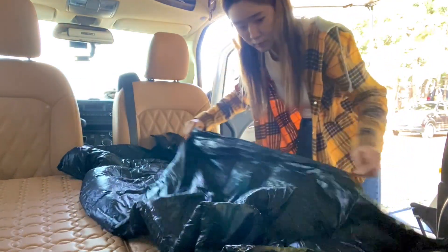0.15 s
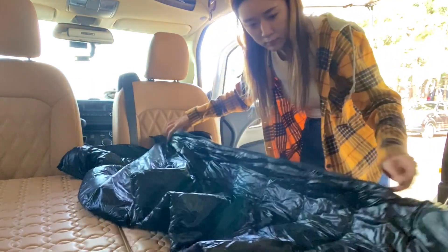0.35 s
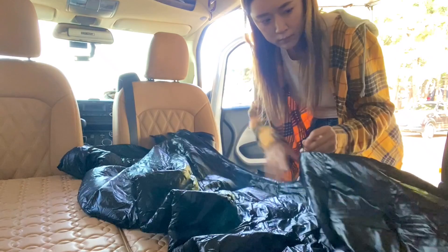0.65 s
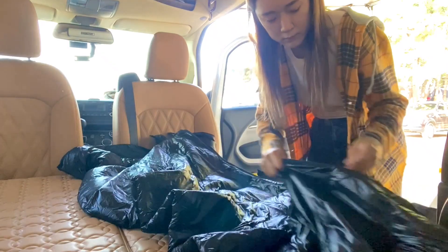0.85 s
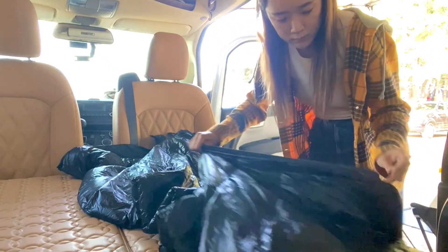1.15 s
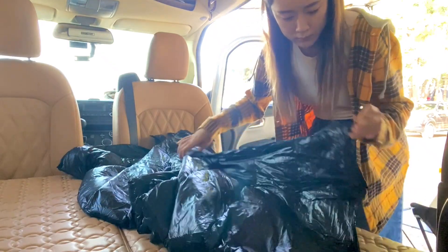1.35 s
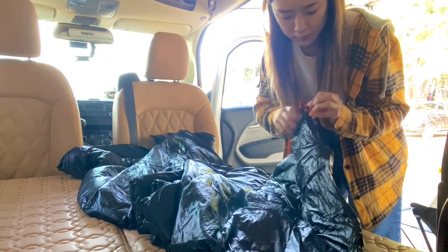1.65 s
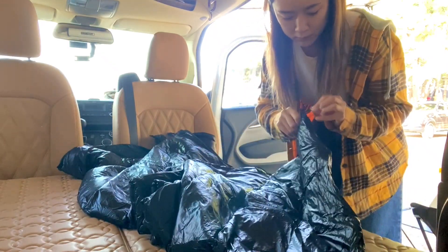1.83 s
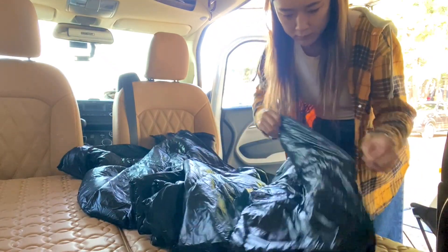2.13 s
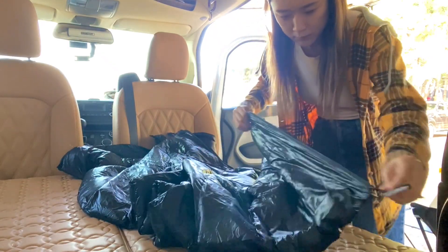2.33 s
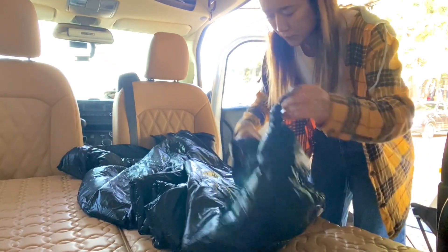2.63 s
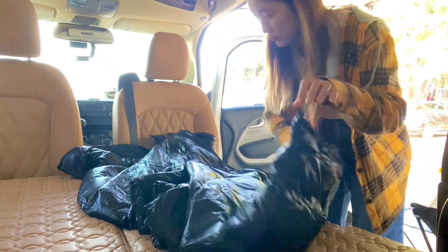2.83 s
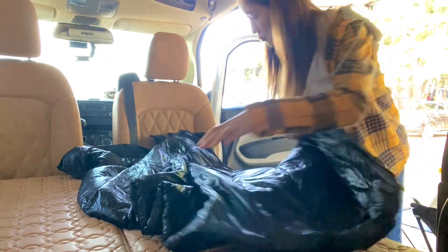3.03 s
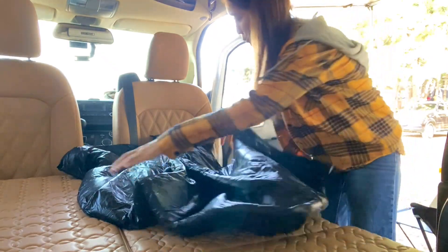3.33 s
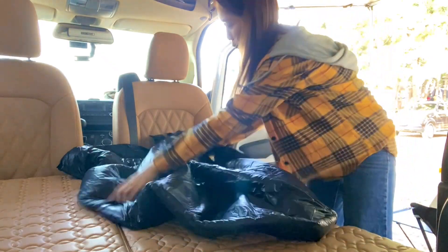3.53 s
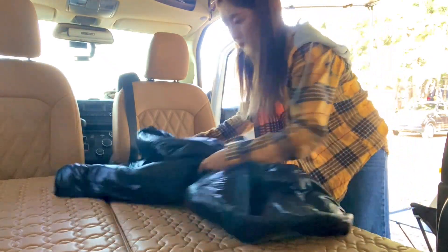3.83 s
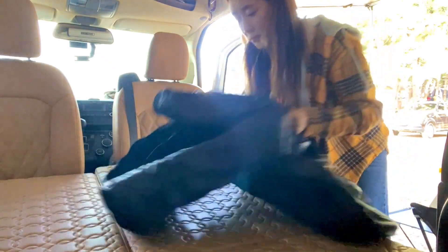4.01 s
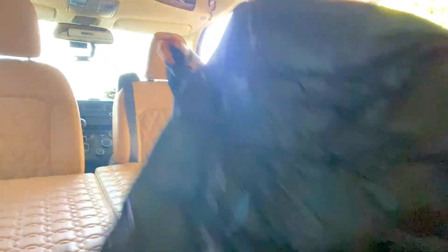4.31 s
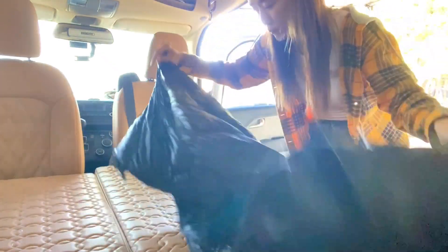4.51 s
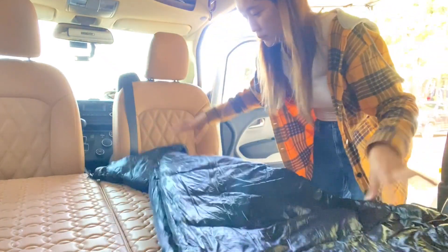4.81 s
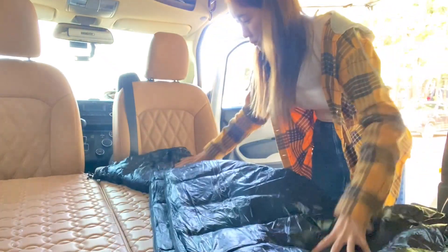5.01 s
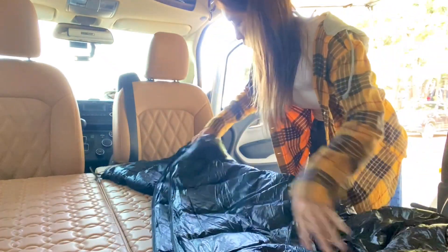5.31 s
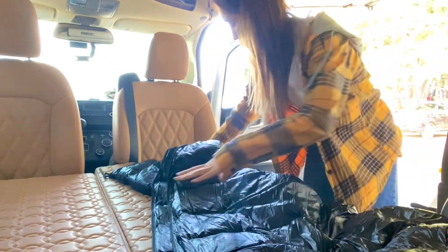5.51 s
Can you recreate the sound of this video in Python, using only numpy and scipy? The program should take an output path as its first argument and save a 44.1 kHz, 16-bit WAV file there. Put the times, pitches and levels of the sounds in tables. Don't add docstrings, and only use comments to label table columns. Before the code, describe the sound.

In a small vehicle cabin, a coil zipper rasps in four pulls, nylon rustles and flaps, and hollow thumps land above a faint motor drone.

```python
import sys
import numpy as np
from scipy import signal
from scipy.fft import rfft, irfft, next_fast_len
from scipy.io import wavfile
from scipy.ndimage import uniform_filter1d

SR = 44100
rng = np.random.default_rng(int(sys.argv[2]) if len(sys.argv) > 2 else 0)


def log_audio(samples):
    frames = np.atleast_2d(samples).T
    limited = np.clip(frames, -1, 1)
    pcm = np.round(limited * 32767).astype(np.int16)
    wavfile.write(sys.argv[1], SR, pcm)


def magnitude_from_level(level_db):
    exponent = np.asarray(level_db, float) / 20
    return 10 ** exponent


N = 249606
SIZE = next_fast_len(N)

# start_s, end_s, scrape_db against the knocks, odd_tooth_share (0-1)
PULLS = [
    (-.1, 0.313, -7, 0),
    (0.791, 1.043, -8.5, .4),
    (1.136, 1.254, -3, 0.32),
    (1.898, 2.325, -7, .2),
]


def unit(x):
    return x / np.sqrt(np.mean(np.abs(x) ** 2))


def over_hz(table):
    hz, value = np.transpose(table)
    bin_hz = np.arange(SIZE // 2 + 1) * SR / SIZE
    return np.interp(np.log(bin_hz + 1), np.log(hz), value)


def over_time(table):
    s, *columns = np.transpose(table)
    return [np.interp(np.arange(N) / SR, s, column) for column in columns]


def colour(x, gain):
    return irfft(rfft(x, SIZE) * gain, SIZE)[:N]


def walk(rate_hz):
    hold = int(SR / rate_hz)
    levels = np.repeat(rng.standard_normal(N // hold + 1), hold)
    return unit(uniform_filter1d(uniform_filter1d(levels, hold), hold)[:N])


def bumps(rows, rest_db, shape=1.76):
    t = np.arange(0, N + 64, 64) / SR
    power = magnitude_from_level(2 * rest_db)
    for s, db, rise, fall in rows:
        distance = np.where(t < s, (s - t) / rise, (t - s) / fall)
        power = power + magnitude_from_level(2 * db - 20 * np.minimum(distance, 6) ** shape)
    return np.interp(np.arange(N) / SR, t, 10 * np.log10(power))


def echoes(x, t60_s):
    t = np.arange(8192) / SR
    tail = rng.standard_normal(8192) * np.exp(-np.log(1000) * t / t60_s)
    return colour(x, rfft(tail / np.sqrt(np.sum(tail ** 2)), SIZE))


def hum(rumble_db, flap_db, split_hz=110, drift_db=3.0):
    # freq_hz, density_db per Hz
    cabin = [(13, -37), (22, -46), (45, -3), (64, -4), (106, -9), (115, -10.5), (120, -6.5), (123, -26.5),
             (145, -8.5), (161, -20.5), (195, -14), (206, -15), (217, -32), (236, -27.5), (280, -46.5),
             (360, -68), (620, -120)]
    # freq_hz, level_db rms
    motor = [
        (95., -51),
        (158., -69),
        (190.3, -63.5),
    ]
    drone_db, push_db = -61.5, 5
    high_db = 10 * np.log10(magnitude_from_level(2 * drone_db) + magnitude_from_level(2 * (flap_db + push_db)))
    upper = over_hz([(split_hz * 0.71, 0), (split_hz * 1.002, 1)])
    shape = magnitude_from_level(over_hz(cabin))
    rumble = unit(colour(rng.standard_normal(N), shape * np.sqrt(1 - upper)))
    drone = unit(colour(rng.standard_normal(N), shape * np.sqrt(upper)))
    clock = np.cumsum(1 + 0.002 * walk(3.06)) / SR
    lines = 0
    for hz, db in motor:
        lines = lines + np.sqrt(2) * magnitude_from_level(db + drift_db * walk(3.654)) * np.sin(2 * np.pi * hz * clock)
    return magnitude_from_level(rumble_db) * rumble + magnitude_from_level(high_db) * drone + lines


def drags(width_share=0.16, patchy_db=2.5):
    # peak_s, level_db, rise_s, fall_s, centre_hz
    drag_rows = [
        (.77, -54, .03, .03, 900),
        (.9, -51, .03, .05, 850),
        (1.02, -50, .03, .04, 980),
        (1.175, -53, .02, .03, 830),
        (3.18, -63, .05, .05, 550),
        (3.56, -59, .08, .3, 580),
        (3.85, -60, .15, .15, 560),
        (4.08, -57, .15, .07, 560),
        (5.03, -58, .04, .04, 250),
        (1.93, -66, .03, .06, 380),
    ]
    out = 0
    friction = rng.standard_normal(N) * magnitude_from_level(patchy_db * walk(40))
    for s, db, rise, fall, hz in drag_rows:
        edges_hz = [hz * (1 - width_share), hz * (1 + width_share)]
        band = signal.butter(2, edges_hz, "band", fs=SR, output="sos")
        out = out + magnitude_from_level(bumps([(s, db, rise, fall)], -120)) * unit(signal.sosfilt(band, friction))
    return out


def handling():
    # peak_s, hiss_db, rise_s, fall_s, heaviness_db
    moves = [(.2, -55, 0.36, 0.22, 7), (.46, -58, 0.25, 0.22, 4.5), (.8, -57, .14, .3, 14),
             (1.1, -54.5, 0.34, .2, 13), (1.27, -60.5, 0.078, 0.069, 2.5), (1.441, -64, 0.093, 0.072, 6),
             (1.645, -63, 0.028, 0.13, -21.5), (2.315, -59, .3, .03, 1.5), (2.43, -68, 0.069, 0.054, -9),
             (2.511, -58, 0.027, 0.11, -7), (2.76, -58.5, 0.24, 0.047, -2), (2.89, -57.5, 0.19, 0.15, 1),
             (3.23, -57, 0.4, .08, -2), (3.42, -61, 0.17, 0.088, 0.5), (3.56, -52, 0.099, 0.35, -2),
             (3.85, -54, 0.19, 0.31, -2.5), (4.141, -52, .12, 0.13, 5), (4.349, -50.5, 0.07, 0.27, 10.5),
             (4.5, -54.5, 0.14, .2, 1), (4.75, -53, 0.2, 0.2, 6), (5.02, -56.5, 0.07, 0.11, 4.5),
             (5.15, -54, 0.15, 0.092, -0.5), (5.36, -59, 0.3, 0.15, -1), (5.63, -59.5, 0.075, 0.16, 5)]
    # peak_s, hiss_db, rise_s, fall_s, heaviness_db
    tugs = [(.3, -59.5, .05, 0.033, 14.5), (.69, -66, 0.026, .05, 16.5), (1.36, -70, 0.042, 0.055, -5),
            (1.52, -71.5, .05, .1, 3), (1.74, -66, .06, .03, -13), (1.925, -69, .035, 0.048, 13),
            (2.6, -67.5, 0.048, .08, 5), (3.1, -62, .06, 0.074, -2), (3.95, -62.5, .06, .05, 0.5),
            (4.62, -56, 0.048, 0.075, 10), (5.25, -62, .05, 0.068, 5), (5.45, -68, .05, 0.066, -7)]
    # base_db against the hiss, gain_db per dB of heaviness, rest_db
    ranges = [
        (0, 0, -81),
        (-1.5, 0.0925, -77),
        (-2.5, 0.36, -79.5),
        (-11.5, 1.0, -83),
    ]
    levels_db = []
    for base_db, lean, rest_db in ranges:
        rows = [(s, db + base_db + lean * heavy, rise, fall) for s, db, rise, fall, heavy in moves + tugs]
        levels_db.append(bumps(rows, rest_db))
    return levels_db


def cloth(levels_db, grain_db=1.5, swell_db=0.73, flicker_db=1.5):
    cloth_hz = [8000, 2700, 800, 310]
    # freq_hz, density_db per Hz
    nylon = [(130, -24.5), (220, -11), (296, -17), (567, -6), (878, -8), (976, -5.5), (1230, -6.5),
             (1360, -4), (4180, -6.5), (9030, -11.5), (13100, -17.5), (13800, -31), (14500, -45)]
    place = over_hz([(hz, k) for k, hz in enumerate(cloth_hz)][::-1])
    tone, swell, out = magnitude_from_level(over_hz(nylon)), walk(15), 0
    for k, db in enumerate(levels_db):
        grain = rng.exponential(size=N // 32 + 1).repeat(32)[:N]
        crinkles = rng.standard_normal(N) * magnitude_from_level(grain_db * grain)
        overlap = np.clip(1 - abs(place - k), 0, 1)
        part = unit(colour(crinkles, tone * overlap))
        out = out + part * magnitude_from_level(db + swell_db * swell + flicker_db * walk(29.936))
    return out


def creases(snap_s=0.0093, trim_db=-2):
    # start_s, peak_db, centre_hz
    crease_rows = [(0.4358, -38.5, 2680), (1.3894, -51, 3120), (1.437, -45.5, 2800), (1.6446, -63, 3050),
                   (1.8404, -52, 8870), (2.3294, -57, 3370), (2.4203, -60, 7630), (2.508, -49, 11190),
                   (2.758, -43, 8690), (3.2594, -55, 2730), (4.0114, -53, 8850), (4.154, -42, 2700),
                   (4.4054, -30.5, 3320), (4.425, -26, 3400), (4.7442, -32.5, 10960), (5.1289, -36.5, 2500)]
    out, t = np.zeros(N + 1024), np.arange(1024) / SR
    for s, db, hz in crease_rows:
        band = signal.butter(1, [0.5 * hz, min(1.8 * hz, 16000)], "band", fs=SR)
        pop = signal.lfilter(*band, rng.standard_normal(1024)) * np.exp(-t / snap_s)
        out[int(s * SR):][:1024] += magnitude_from_level(db + trim_db) * pop / abs(pop).max()
    return out[:N]


def slaps(push_s=0.00059, crack_s=0.004, body_db=-9, frame_db=-3, jitter=0.036, trim_db=-2):
    # start_s, peak_db, ring_hz, sharpness_db
    slap_rows = [(0.673, -39.5, 364, -19), (4.315, -27, 690, -12), (4.321, -26.5, 588, -10),
                 (4.375, -40, 277, -12), (4.404, -24.5, 1000, -14), (4.409, -19, 377, -17),
                 (4.421, -12, 393, -8), (4.426, -13, 390, -13), (4.435, -25.5, 455, -8),
                 (4.459, -34, 318, -14), (4.521, -34, 356, -25), (4.529, -25, 330, -23),
                 (4.533, -31, 450, -33), (4.569, -36, 377, -27), (4.629, -38.5, 260, -10),
                 (4.686, -37, 754, -16), (4.743, -28.5, 1070, -4), (4.75, -32, 283, -3.5)]
    # freq_hz, level_db
    bed = [(372, -9), (450, -14), (590, -15), (700, 3.5), (1130, 0)]
    frame_hz = [1430, 1730, 2070, 2310, 2630]
    t60_s = 0.035
    out, t = np.zeros(N + 4096), np.arange(4096) / SR
    bed_hz, bed_db = np.transpose(bed)
    fixed_hz = np.r_[bed_hz, frame_hz]
    for s, db, hz, sharp_db in slap_rows:
        shift = 1 + jitter * rng.standard_normal(len(fixed_hz))
        polarity = np.sign(rng.standard_normal(len(fixed_hz)))
        mode_hz = np.r_[hz, fixed_hz * shift][:, None]
        body = bed_db + body_db + 0.4 * (sharp_db + 12) * np.log2(bed_hz / 372)
        gain = np.r_[1, magnitude_from_level(np.r_[body, [sharp_db + frame_db] * len(frame_hz)]) * polarity]
        decay = np.exp(-np.log(1000) * t / t60_s * np.sqrt(mode_hz / 400))
        ring = gain @ (np.sin(2 * np.pi * mode_hz * t) * decay)
        ring *= 1 - np.exp(-t / (push_s * magnitude_from_level(-0.6 * (sharp_db + 11.5))))
        crack = np.diff(rng.standard_normal(4097)) * np.exp(-t / crack_s) / 3
        crack_db = -48 + 0.4 * (db + 28) - db
        i = int(s * SR)
        out[i:i + 4096] += magnitude_from_level(db + trim_db) * (ring / abs(ring).max() + magnitude_from_level(crack_db) * crack)
    return out[:N]


def pulling():
    # time_s, teeth_hz (teeth per second), level_db
    strokes = [
        [(0.0, 2080, -39.5), (0.05, 2540, -37), (0.088, 2330, -35.5), (0.12, 2391, -38.5), (0.15, 2410, -37.5),
         (0.207, 2135, -38), (0.231, 1900, -35.5), (0.255, 1360, -38.5), (0.305, 840, -45)],
        [(0.79, 802, -53), (0.825, 1002, -44), (0.86, 1454, -42), (0.9, 1690, -38), (0.927, 1903, -38),
         (0.947, 1928, -33.5), (0.993, 1394, -43), (1.019, 971, -46), (1.06, 985, -49)],
        [(1.14, 759, -54), (1.172, 800, -50), (1.208, 1250, -45), (1.25, 1232, -52.5)],
        [(1.9, 539, -59.5), (1.96, 699, -45), (2.02, 1141, -42.5), (2.07, 1362, -41), (2.13, 1515, -39.5),
         (2.185, 1500, -40), (2.229, 1232, -42), (2.262, 928, -38.5), (2.33, 808, -56.5)],
    ]
    easy_slip = [1.15, .8, 2.2, .87]
    # centre_s, half_length_s, extra_slip_rad
    snags = [
        (.03, .06, .3),
        (.085, .025, 1.1),
        (.985, .035, 2.9),
        (1.9, .055, 1.5),
        (.3, .03, .8),
        (2.33, .04, 1.2),
    ]
    slow_scrape_db = 1
    t = np.arange(N) / SR
    hz, db = over_time(sum(strokes, []))
    start_s, _, pull_scrape_db, odd = np.transpose(PULLS)
    which = np.clip(np.searchsorted(start_s, t) - 1, 0, None)
    fastest_hz = np.array([max(row[1] for row in stroke) for stroke in strokes])[which]
    scrape_db = pull_scrape_db[which] + slow_scrape_db * np.log2(fastest_hz / hz)
    slip = np.array(easy_slip)[which]
    for s, half, more in snags:
        slip = slip + more * np.exp(-((t - s) / half) ** 4)
    return hz, db, scrape_db, odd[which], slip


def zipper(gate=0.99, edge_s=0.017, count=16):
    # freq_hz, level_db
    slider = [(300, -28), (750, -2), (1100, 5.5), (1500, 7), (2200, 4), (3000, 0.5), (4500, -2),
              (7000, -2.5), (10000, -4), (14000, -25)]
    knock_db = [0, 1.5, 0, -3, -6, -8, -11, -13]
    # freq_hz, level_db
    scrape_tone = [(300, -39), (700, -9), (1400, -3), (2500, 0.5), (4500, 0), (7000, 0), (10000, -5),
                   (13000, -10.5), (14200, -20.5)]
    wobble, flutter_db = 0.018, 3.5
    t = np.arange(N) / SR
    on = sum(np.clip(np.minimum(t - a, b - t) / edge_s, 0, 1) for a, b, *_ in PULLS)
    hz, db, scrape_db, odd, slip = pulling()
    pair = np.pi * np.cumsum(hz * (1 + wobble * slip * walk(130))) / SR
    slider_hz, slider_db = np.transpose(slider)
    knock = power = 0
    for k in range(1, count + 1):
        ring_db = np.interp(np.log(k * hz / 2), np.log(slider_hz), slider_db)
        gain = magnitude_from_level(ring_db + knock_db[(k - 1) // 2])
        if k % 2:
            gain = gain * np.clip(odd, 0, 0.4)
        flutter = magnitude_from_level(flutter_db * walk(170))
        knock = knock + gain * flutter * np.cos(k * pair + slip * walk(330))
        power = power + gain ** 2
    knock = knock / np.sqrt(power) * magnitude_from_level(1.5 - 1.2 * slip)
    scrape = rng.standard_normal(N) * (1 + gate * np.cos(2 * pair))
    scrape = unit(colour(scrape, magnitude_from_level(over_hz(scrape_tone))))
    return on * magnitude_from_level(db) * (knock + magnitude_from_level(scrape_db + 1.7 * walk(60.13)) * scrape)


def array(middle, reflected):
    # freq_hz, side_minus_middle_db
    side_db = [(30, -5), (110, -7), (200, -2), (370, -4.5), (680, 4), (1250, 1), (2300, 0.5), (4200, 0),
               (6000, -1), (7200, -6), (8800, -31), (10500, -6.5), (12500, 0), (14200, 17)]
    # freq_hz, left_minus_right_db
    lean_db = [(60, 7.0), (110, 9), (200, 7.5), (370, 2.5), (680, 0.4), (1250, 3.2), (2310, 4.5),
               (4230, 3.6), (7780, 0.4), (14300, -0.5)]
    # freq_hz, signed share of side that is the middle turned a quarter cycle
    turned_share = [(60, 0.54), (300, .6), (700, 0.92), (950, 0.6), (1400, -0.73), (1900, -0.88),
                    (2400, 0.25), (6000, .1), (11000, -.3), (14000, -0.76)]
    power, ratio = magnitude_from_level(2 * over_hz(side_db)), magnitude_from_level(2 * over_hz(lean_db))
    limit = 0.9 * np.sqrt(power)
    in_step = np.clip((1 + power) / 2 * (ratio - 1) / (ratio + 1), -limit, limit)
    rest = np.sqrt(power - in_step ** 2)
    turned = np.clip(over_hz(turned_share), -1, 1)
    side = colour(middle, in_step - 1j * rest * turned)
    side = side + colour(reflected, rest * np.sqrt(1 - turned ** 2))
    return np.array([middle + side, middle - side])


def scene():
    # peak_s, level_db, rise_s, fall_s
    swells = [(.08, -43.5, 0.089, .4), (.71, -33.5, 0.037, 0.062), (.93, -42.5, 0.097, 0.18),
              (1.32, -40.5, 0.058, 0.17), (1.85, -40.5, 0.17, 0.054), (2.22, -42, 0.24, 0.2),
              (2.71, -39.5, .1, 0.036), (2.88, -40, 0.1, 0.21), (3.23, -39, 0.088, 0.046),
              (3.6, -41, 0.17, 0.066), (4.15, -42, .1, 0.071), (4.62, -42, 0.054, .06),
              (1.65, -45, .03, 0.12), (5.6, -42, 0.23, .2), (4.75, -36, .2, 0.3)]
    hands, air = handling(), bumps(swells, -45.5)

    def soft():
        return hum(air, hands[-1]) + cloth(hands)

    drag = drags()
    sharp = creases() + slaps() + zipper()
    sharp = sharp + magnitude_from_level(-4) * echoes(sharp, 0.076)
    middle = soft() + drag + sharp
    reflected = soft() + echoes(drag, 0.047) + echoes(sharp, 0.043)
    return array(middle, reflected)


def roll_off(x):
    return signal.sosfilt(signal.butter(12, 14890, fs=SR, output="sos"), x)


def record(dry):
    return roll_off(dry)


dry = scene()
out = record(dry)
log_audio(out)
```